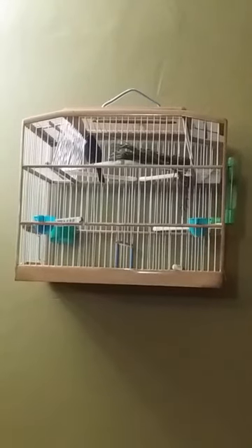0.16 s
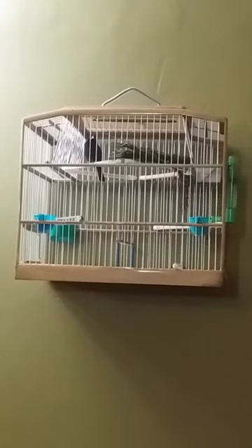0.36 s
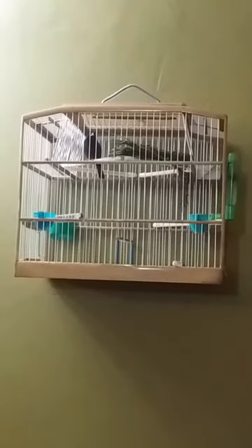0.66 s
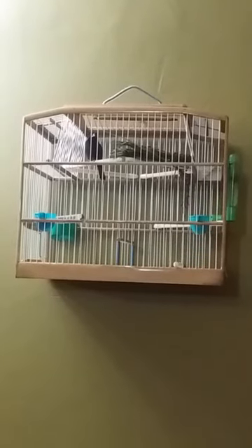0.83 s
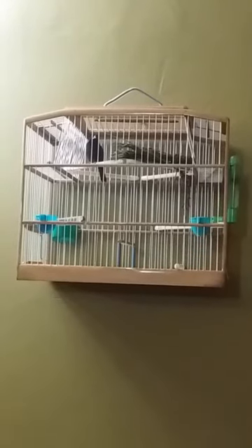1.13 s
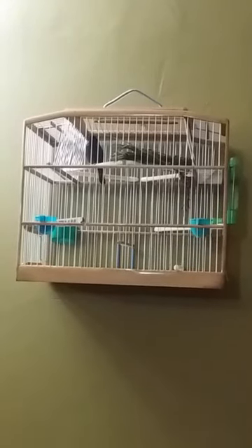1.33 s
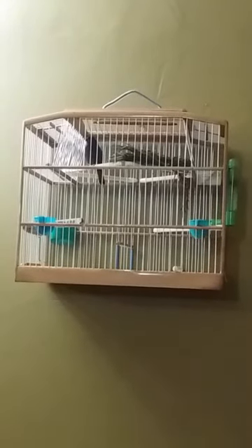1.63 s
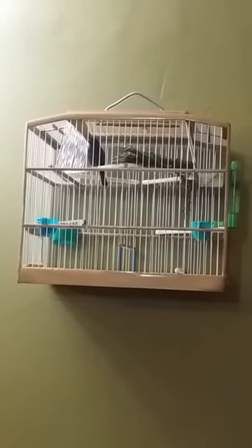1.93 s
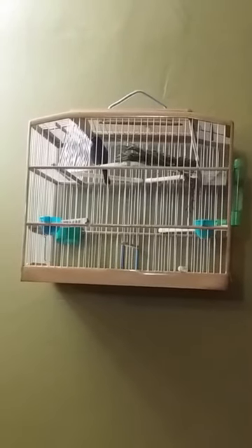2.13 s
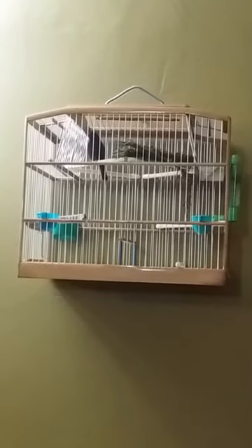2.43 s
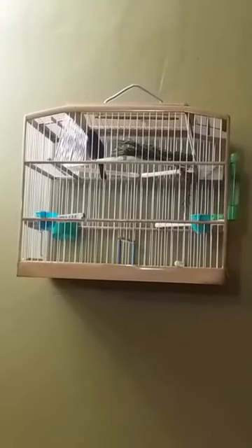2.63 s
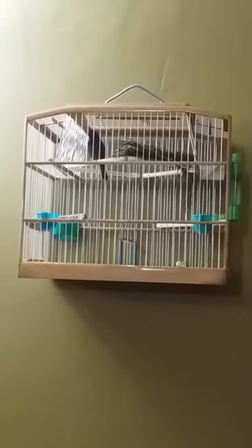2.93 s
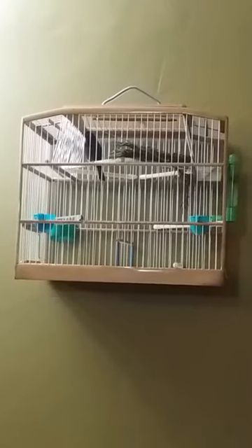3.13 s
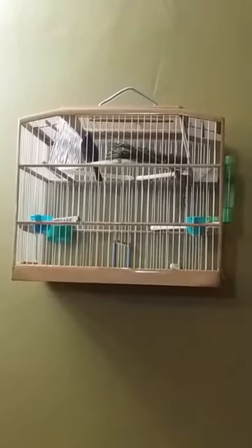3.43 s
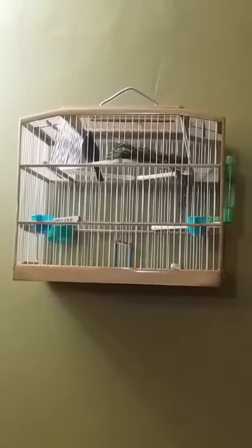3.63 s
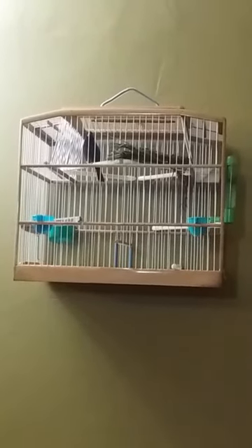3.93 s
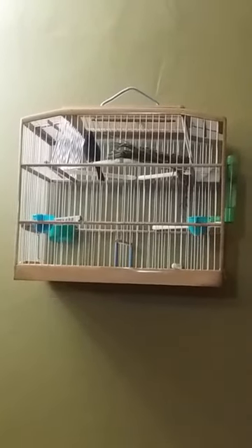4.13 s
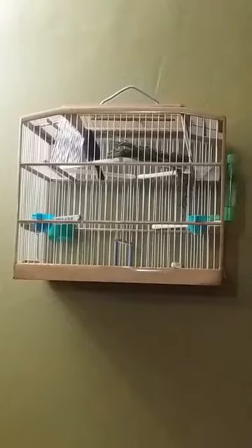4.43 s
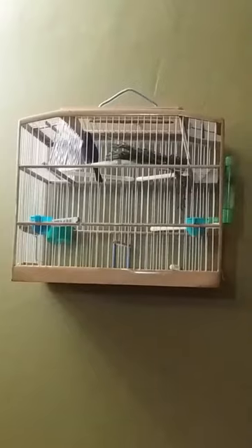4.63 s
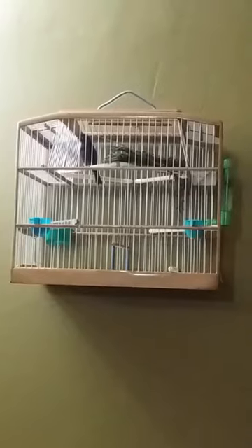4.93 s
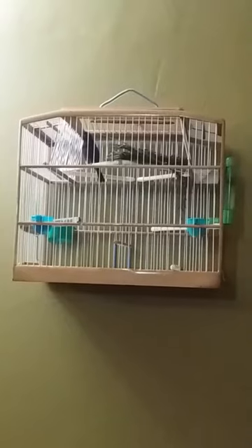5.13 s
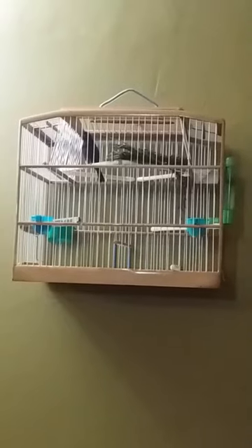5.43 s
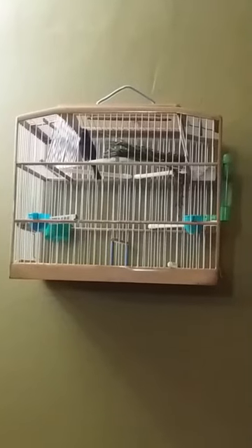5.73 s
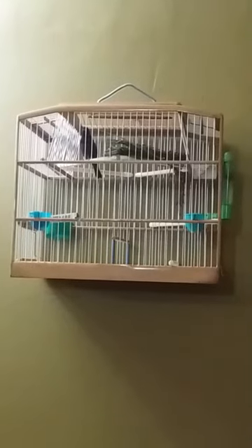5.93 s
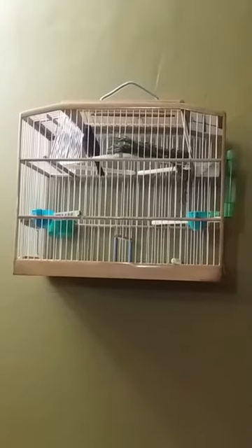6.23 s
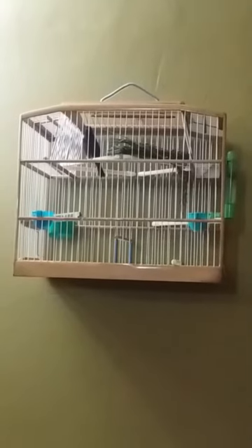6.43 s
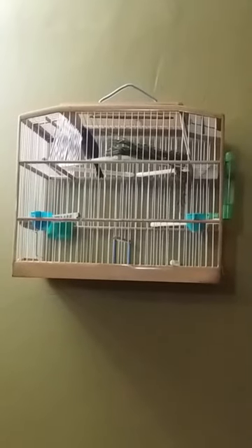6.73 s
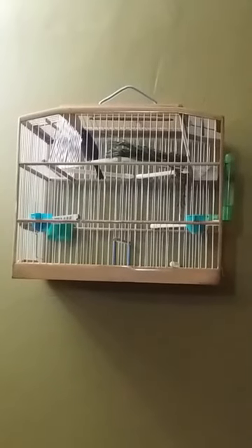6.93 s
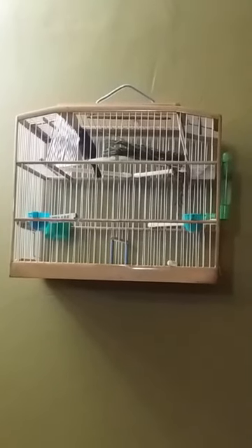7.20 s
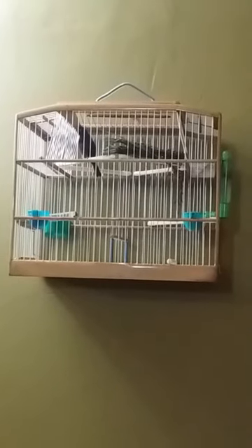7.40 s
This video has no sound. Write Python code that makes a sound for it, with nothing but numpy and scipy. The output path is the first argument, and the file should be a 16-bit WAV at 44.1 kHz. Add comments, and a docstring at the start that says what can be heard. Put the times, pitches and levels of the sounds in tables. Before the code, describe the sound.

Quick, gliding chirps and whistles from a small bird grow louder indoors, over a faint high whine and low hum.

```python
"""Caged finch in a bare room

Soft rising sweeps run all the way through; clear slurred whistles join them and grow louder.
Each note is one gliding, almost pure tone from the syrinx, echoing off the walls.
Behind the song sit softer calls from further off, light claw taps on the cage,
a thin electrical whine, mains hum and a low room rumble."""
import sys
import numpy as np
from scipy import signal
from scipy.fft import rfft, irfft
from scipy.io import wavfile
from scipy.ndimage import uniform_filter1d, minimum_filter1d

SR = 44100
rng = np.random.default_rng(int(sys.argv[2]) if len(sys.argv) > 2 else 0)


def materialize(psi):
    """Save the field psi as 16-bit PCM at rate SR to the path in sys.argv[1].

    A 1-D psi becomes a single channel; in a 2-D psi each row is a channel.
    """
    bounded = np.clip(np.atleast_2d(psi).T, -1, 1)
    quanta = np.round(bounded * 32767).astype(np.int16)
    wavfile.write(sys.argv[1], SR, quanta)


N = 333374
T = np.arange(N) / SR
LEAD = SR // 2  # samples of pre-roll, so the room is already ringing at time zero
OPEN_S, SHUT_S = .02, .0072  # the gate opens just before a note and shuts just after it


# lead whistles: t/s, length/s, from f/Hz, to f/Hz, glide/s, relative level/dB
WHISTLES = [ (2.629, 0.17, 5050, 4500, 0.03, -32), (2.873, 0.19, 5210, 3508, 0.05, -23.5),
            (3.133, 0.12, 3420, 4012, 0.048, -21), (3.334, 0.2, 3652, 3370, 0.12, -20),
            (3.589, 0.13, 3610, 3967, 0.05, -20), (3.817, 0.2, 4990, 3526, 0.057, -18),
            (4.116, 0.14, 3254, 4040, 0.071, -15), (4.363, .126, 3266, 3915, .065, -9.5),
            (4.56, 0.2, 3397, 2730, 0.097, -16.5), (4.85, 0.11, 3087, 3613, .051, -9.5),
            (5.045, 0.16, 5140, 4225, 0.041, -13), (5.28, 0.17, 5140, 3232, .06, -7.5),
            (5.527, 0.17, 5163, 3256, 0.064, -8.5), (5.794, 0.13, 3154, 4052, 0.069, -5),
            (6.011, 0.14, 3115, 3919, .065, -4.5), (6.228, 0.18, 3440, 2766, 0.075, -14),
            (6.553, 0.1, 3189, 3727, 0.048, -7), (6.779, 0.12, 3148, 3579, .047, -8),
            (6.962, .172, 5082, 3976, 0.039, -7), (7.181, 0.23, 4850, 2957, .102, -10.5),
            (7.492, 0.19, 4772, 3024, 0.1, -7.5)]

def whistles():
    """The lead voice: loud slurs that fall or rise and then level off."""
    rising = dict(bend=2.8, swell_s=.054, fade_s=.051)
    falling = dict(bend=1.75, swell_s=.048, fade_s=.081)
    bus = np.zeros(LEAD + N)
    for start, length_s, from_hz, to_hz, glide_s, db in WHISTLES:
        manner = rising if to_hz > from_hz else falling
        contour = slur(length_s, from_hz, to_hz, glide_s, **manner)
        tone, overtones = note(contour, db, waver=.0055, waver_hz=195.1,
                               rasp=.025, rasp_hz=1400, flutter_db=4)
        add(bus, start - OPEN_S, tone + overtones)
    return undb(-2.5) * room(bus, WALL_ECHOES, tail_db=-2, build_s=.0027)


# articulation by kind: starting share of the top pitch, length/s, bend, swell/s, fade/s
SWEEP_KINDS = {"full": (.39, 0.13, 1.27, 0.047, 0.016), "high": (0.53, 0.13, 1.44, 0.044, .06),
               "slight": (.4, 0.13, 1.4, 0.04, .03)}
# rasp depth by kind, 0-1: the faint sweeps are the hoarsest
SWEEP_RASP = {"full": .33, "high": .33, "slight": .55}
# throat resonance that the sweeps climb through: f/Hz, gain/dB
SWEEP_THROAT = [(1150, 2), (1450, -3), (1750, -3.5), (2000, -.5), (2500, 0)]
# rising sweeps: t/s, top f/Hz, relative level/dB, kind
SWEEPS = [ (-.07, 2830, -30.5, "full"), (.216, 2928, -37.5, "slight"), (.278, 3028, -32, "high"),
          (.458, 2750, -42, "slight"), (.655, 2808, -29.5, "full"), (1.016, 2936, -38.5, "slight"),
          (1.121, 3080, -31, "high"), (1.274, 2730, -42, "slight"), (1.514, 2650, -42.5, "slight"),
          (1.704, 2945, -37, "slight"), (1.749, 3035, -32, "high"), (1.942, 2744, -41, "slight"),
          (2.122, 2830, -30.5, "full"), (2.365, 3014, -41.5, "slight"), (2.55, 2940, -39, "slight"),
          (2.65, 3124, -30.5, "high"), (2.859, 2760, -31, "full"), (3.149, 2980, -38.5, "slight"),
          (3.244, 2684, -41.5, "slight"), (3.415, 3160, -31.5, "high"), (3.576, 2790, -41.5, "slight"),
          (3.845, 2890, -28.5, "full"), (4.112, 3067, -31, "high"), (4.319, 2665, -42, "slight"),
          (4.52, 2794, -29, "full"), (5.016, 2810, -38.5, "slight"), (5.065, 3057, -33.5, "high"),
          (5.268, 2874, -38, "slight"), (5.517, 2830, -30, "full"), (5.916, 2930, -40.5, "slight"),
          (6.166, 2857, -29, "full"), (6.57, 2680, -42.5, "slight"), (6.824, 2860, -40.5, "slight"),
          (7.055, 2844, -29.5, "full")]

def sweeps(glide_s=.051):
    """Soft, hoarse upward sweeps; the faintest arrive mostly by way of the walls."""
    clear, faint = np.zeros((2, LEAD + N))
    for start, top_hz, db, kind in SWEEPS:
        low_share, length_s, *manner = SWEEP_KINDS[kind]
        t, pitch, shape_db = slur(length_s, low_share * top_hz, top_hz, glide_s, *manner)
        tone, _ = note((t, pitch, shape_db), db, waver=.01, waver_hz=409.3,
                       rasp=SWEEP_RASP[kind], rasp_hz=348.5, flutter_db=2.5)
        add(faint if kind == "slight" else clear, start - OPEN_S, tone * colour(pitch, SWEEP_THROAT))
    present = undb(-2.8) * room(clear, SWEEP_ECHOES, tail_db=.3, build_s=.006)
    washed = undb(-4) * room(faint, SWEEP_ECHOES, tail_db=3.5, build_s=.0098)
    return present + washed


def slur(length_s, from_hz, to_hz, glide_s, bend, swell_s, fade_s, swell_db=19, fade_db=12.5):
    """Time, pitch and level curves of a note; more bend holds the first pitch longer before the glide."""
    t = np.arange(-OPEN_S, length_s + SHUT_S, 1 / SR)
    pitch = to_hz + (from_hz - to_hz) * np.exp(-(np.maximum(t, 0) / glide_s) ** bend)
    swell = np.clip(1 - t / swell_s, 0, 1)
    fade = np.clip(1 - (length_s - t) / fade_s, 0, 1)
    return t, pitch, -swell_db * swell - fade_db * fade


# overtones of the syrinx at full voice, ahead of the throat: harmonic number, level/dB
OVERTONES = [(2, -60), (3, -60), (4, -73.5), (5, -68)]
# EQ that throat and beak put on the overtones: f/Hz, gain/dB
THROAT = [(5600, 9.5), (6500, 3), (8000, -3.5), (10000, -7), (12500, -6.5), (15000, 5)]

def note(contour, db, waver, waver_hz, rasp, rasp_hz, flutter_db, overtone_growth=.42):
    """One wavering, slightly raspy tone of the syrinx: its fundamental and its weak overtones."""
    t, pitch, shape_db = contour
    n = len(t)
    wander = waver * walk(waver_hz, n) + .004 * walk(70, n)  # fast waver plus slower, uneven bends
    phase = 2 * np.pi * np.cumsum(pitch * (1 + wander)) / SR
    opening = np.minimum((t - t[0]) / OPEN_S, (t[-1] - t) / SHUT_S)
    gate = np.sin(np.pi / 2 * np.clip(opening, 0, 1)) ** 2
    level_db = db + shape_db + flutter_db * walk(121.3, n)
    grit = 1 + rasp * (walk(rasp_hz, n) + 1j * walk(rasp_hz, n))
    tone = undb(level_db) * np.imag(grit * np.exp(1j * phase))
    overtones = sum(undb(d) * colour(k * pitch, THROAT) * np.sin(k * phase) for k, d in OVERTONES)
    # the throat is tuned to the fundamental, so the overtones swell far less than it does, and unevenly
    overtone_db = overtone_growth * level_db + 6.1 * walk(35, n)
    return gate * tone, gate * undb(overtone_db) * overtones


# distant calls: t/s, length/s, from f/Hz, to f/Hz, glide/s, relative level/dB
FAR_CALLS = [ (0.123, .1, 3380, 3550, 0.031, -50), (.585, .06, 1470, 1310, 0.028, -52),
             (0.938, 0.1, 2730, 3680, 0.074, -42), (2.415, 0.088, 3780, 3990, 0.035, -42.5),
             (4.17, 0.18, 1787, 2013, .045, -47.5), (4.462, 0.082, 1060, 1170, .04, -47),
             (5.003, 0.068, 1330, 1380, 0.033, -44)]
# one faint peep: length/s, from f/Hz, to f/Hz, glide/s
PEEP = (0.065, 4400, 4320, 0.025)

def far_calls(peep_count=6, peep_period_s=.465, peep_db=-58):
    """Soft slurs and an opening row of even peeps from further off, heard mostly through the room."""
    bus = np.zeros(LEAD + N)
    peeps = [(.01 + k * peep_period_s, *PEEP, peep_db) for k in range(peep_count)]
    for start, length_s, from_hz, to_hz, glide_s, db in FAR_CALLS + peeps:
        contour = slur(length_s, from_hz, to_hz, glide_s, bend=2, swell_s=.031, fade_s=.051)
        tone, _ = note(contour, db, waver=.01, waver_hz=202, rasp=.2, rasp_hz=298, flutter_db=3)
        add(bus, start - OPEN_S, tone)
    return undb(-4) * room(bus, WALL_ECHOES, tail_db=1, build_s=.0073)


# claw hits on perch and bars: t/s, level/dB, f/Hz, ring T60/s
CLAW_TAPS = [(.275, -52, 4400, .008), (.728, -52, 4660, .008), (1.145, -42, 4750, .012),
             (1.181, -42, 4200, .012), (1.257, -43, 4300, .01), (1.277, -36.5, 1300, .015),
             (2.468, -42, 4370, .008), (2.565, -50.5, 4700, .008), (6.78, -40.5, 5180, .008),
             (6.865, -40.5, 4770, .01)]

def claw_taps(scratch_rad=.32, contact_s=.0008):
    """Claws knock and scratch the perch and the bars, which ring very briefly."""
    bus, t = np.zeros(LEAD + N), T[:SR // 10]
    attack = 1 - np.exp(-(t / contact_s) ** 2)
    for start, db, hz, t60 in CLAW_TAPS:
        ring = np.sin(2 * np.pi * hz * t + scratch_rad * walk(hz / 2, len(t)))
        add(bus, start, undb(db - 60 * t / t60) * attack * ring)
    return room(bus, WALL_ECHOES, tail_db=-.5, build_s=.006)


# tone colour of the whine: f/Hz, relative level/dB
WHINE_COLOUR = [(5900, -105), (6090, -86), (6250, -70), (6410, -74), (6570, -65.5), (6890, -65),
                (7050, -70.5), (7210, -84.5), (7370, -65.5), (7530, -74.5), (7700, -97)]
# drift of one whine line, which the whole comb follows: t/s, f/Hz
WHINE_DRIFT = [(0.1, 6570), (1.22, 6575), (4.08, 6571), (6.85, 6568), (7.4, 6580)]

def electrical_whine(line_hz=6572, rate_hz=159.83, chirp_s=.004, jitter_rad=.51):
    """A tiny, unsteady falling chirp repeats fast enough to give a comb of drifting lines."""
    lines_hz = line_hz + rate_hz * np.arange(-4, 8)
    clock = np.cumsum(np.interp(T, *np.transpose(WHINE_DRIFT)) / line_hz) / SR
    lag_s = chirp_s * (lines_hz[-1] - lines_hz) / np.ptp(lines_hz)  # higher lines arrive earlier
    phases = -2 * np.pi * rate_hz * np.cumsum(lag_s)
    slip = jitter_rad * walk(400, N)
    comb = sum(colour(hz, WHINE_COLOUR) * np.sin(2 * np.pi * hz * clock + phase + slip)
               for hz, phase in zip(lines_hz, phases))
    flicker = 1 + .15 * walk(370, N)
    return np.sqrt(2) * undb(3.5) * comb * flicker


# mains and fan lines: f/Hz, RMS level/dB
HUM = [(59.2, -67), (118.4, -58.5), (193.8, -62.5), (360.7, -66.5), (387.6, -70.5), (506.0, -67.5)]

def hum(drift_rad=1.0):
    """Mains and fan hum: low tones, each wavering on its own."""
    lines = sum(undb(db) * np.sin(2 * np.pi * hz * T + drift_rad * walk(6.7, N)) for hz, db in HUM)
    return np.sqrt(2) * lines


# EQ of the room tone: f/Hz, relative level/dB
RUMBLE = [(25, -51.5), (42, -30), (55, -15), (72, -9), (105, -7), (220, -0.5), (310, -10.5), (500, -13.5),
          (750, -17.5), (1400, -17), (3300, -20.5), (4400, -29.5), (5600, -36), (9000, -46), (15000, -49.5)]

def rumble(rms_db=-50):
    """The bed: steady room noise, weighted to the low end."""
    eq = colour(np.fft.rfftfreq(N, 1 / SR), RUMBLE)
    noise = irfft(rfft(rng.standard_normal(N)) * eq, N)
    return undb(rms_db) * noise / noise.std()


# early wall reflections for whistles, far calls and taps: delay/s, gain/dB
WALL_ECHOES = [(.0043, -13), (0.0122, -5)]
# later wall reflections for the sweeps: delay/s, gain/dB
SWEEP_ECHOES = [(.018, -13), (.038, -6)]

def room(bus, echoes, tail_db, build_s, t60_s=.76):
    """Direct sound, a few wall reflections, then a diffuse tail that builds up and dies away."""
    t = T[:SR]
    tail = rng.standard_normal(SR) * undb(-60 * t / t60_s) * (1 - np.exp(-t / build_s))
    response = tail * undb(tail_db) / np.linalg.norm(tail)
    response[0] += 1
    for delay_s, db in echoes:
        response[int(delay_s * SR)] += undb(db)
    return signal.fftconvolve(bus, response)[LEAD:LEAD + N]


def undb(db):
    """Decibels to gain."""
    return 10 ** (np.asarray(db) / 20)


def colour(hz, points):
    """Gain at the given frequencies of an EQ curve drawn as f/Hz, gain/dB."""
    f, db = np.transpose(points)
    return undb(np.interp(np.log(np.maximum(hz, 1)), np.log(f), db))


def walk(rate_hz, size):
    """Smooth random modulation with a spread near 1."""
    hold = max(int(SR / rate_hz), 1)
    steps = np.repeat(rng.standard_normal(size // hold + 1), hold)
    return 1.133 * uniform_filter1d(uniform_filter1d(steps, hold), hold)[:size]


def add(bus, start_s, sound):
    """Mix a sound into a bus that begins LEAD samples before time zero."""
    i = max(int(start_s * SR) + LEAD, 0)
    part = sound[:max(len(bus) - i, 0)]
    bus[i:i + len(part)] += part


def scene():
    """Mono mix: the song over the quiet room."""
    song = whistles() + sweeps()
    return (song + claw_taps() + electrical_whine() + rumble() + hum() + far_calls())[None]


def record(dry, ceiling=.84, top_hz=15700):
    """The phone's limiter eases the gain down on the loudest peaks; a steep low-pass cuts the top."""
    needed_gain = ceiling / np.maximum(abs(dry), ceiling)
    held_gain = minimum_filter1d(needed_gain, size=600)
    gain = uniform_filter1d(uniform_filter1d(held_gain, size=300), size=300)
    lowpass = signal.ellip(8, .2, 70, top_hz, fs=SR, output="sos")
    return signal.sosfilt(lowpass, gain * dry)


dry = scene()
out = record(dry)
materialize(out)
```